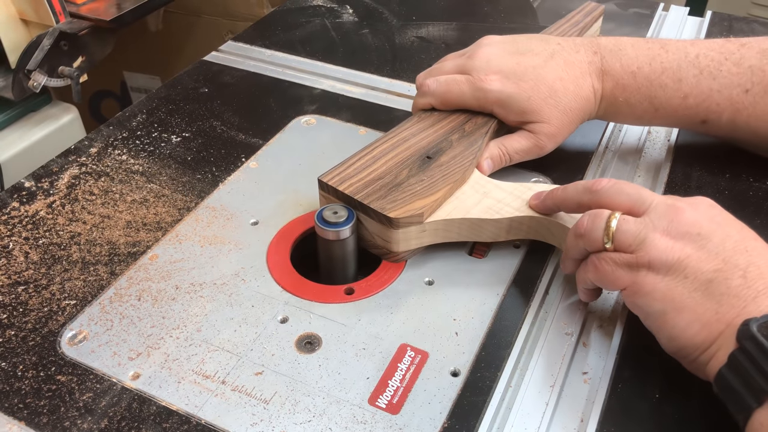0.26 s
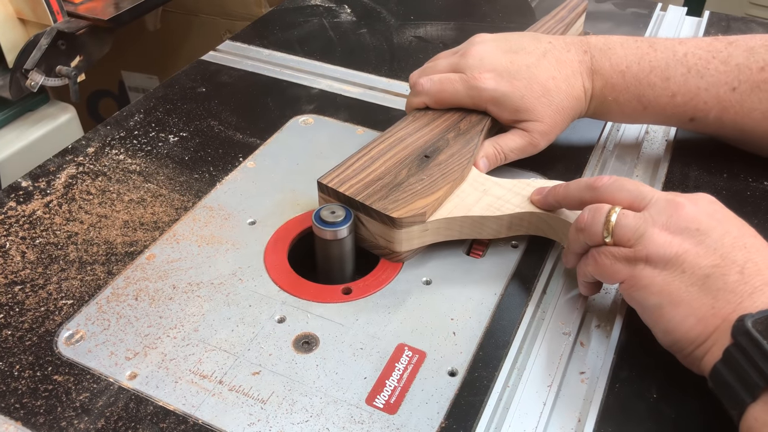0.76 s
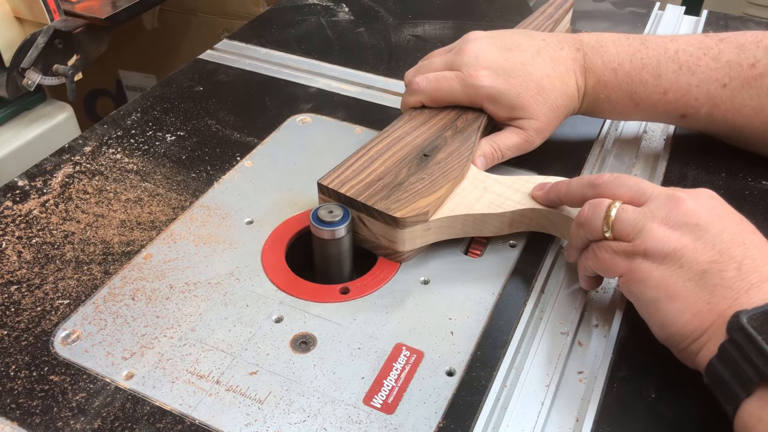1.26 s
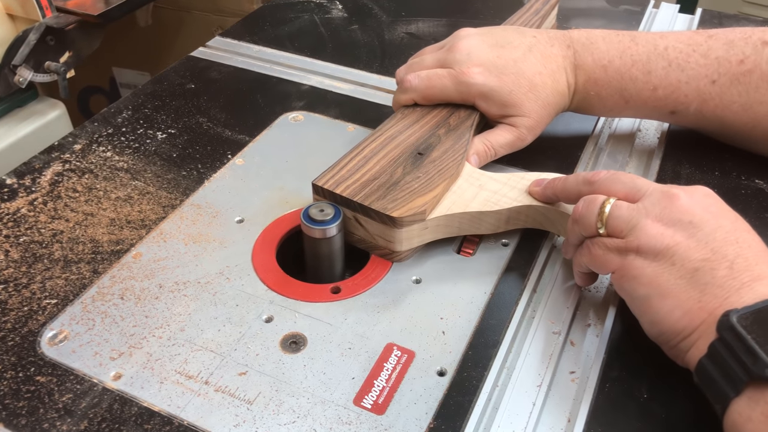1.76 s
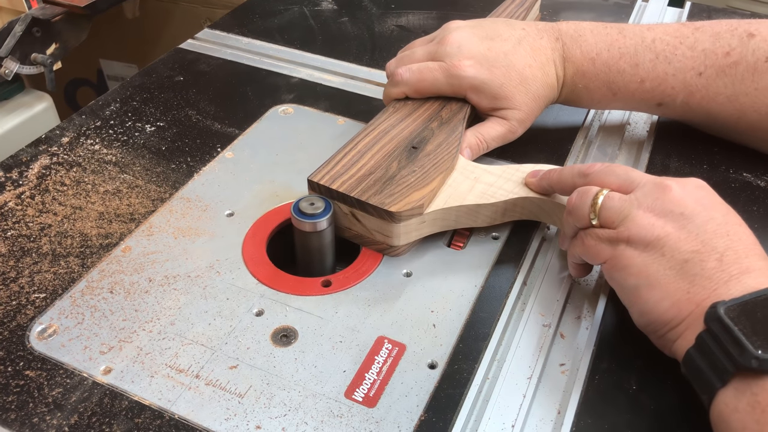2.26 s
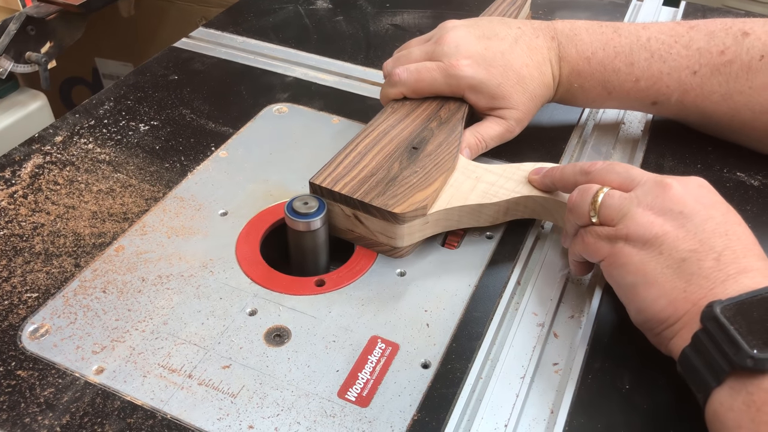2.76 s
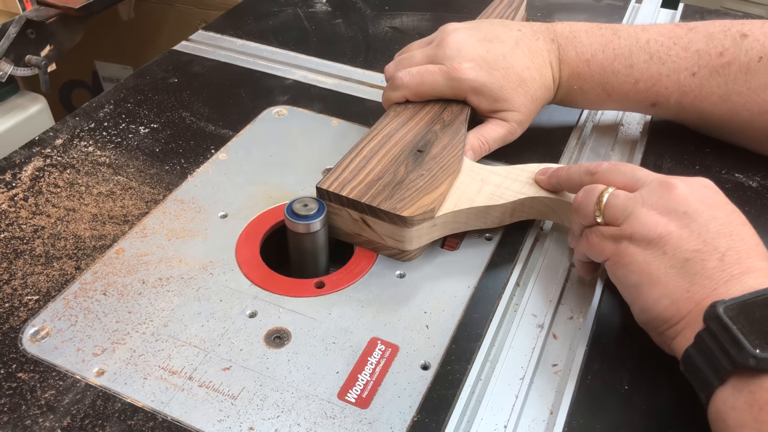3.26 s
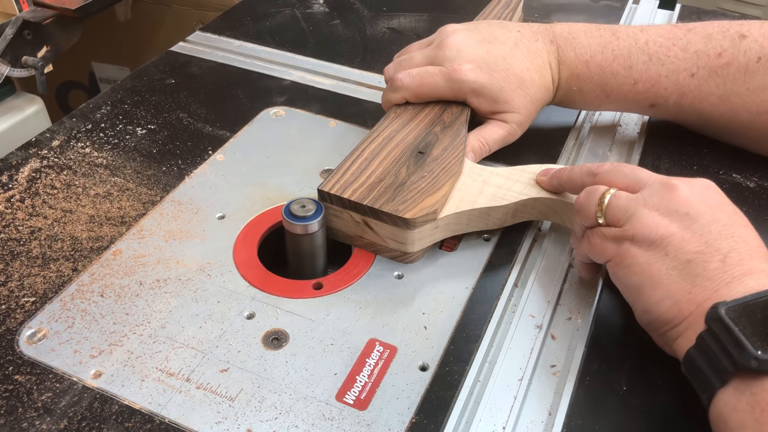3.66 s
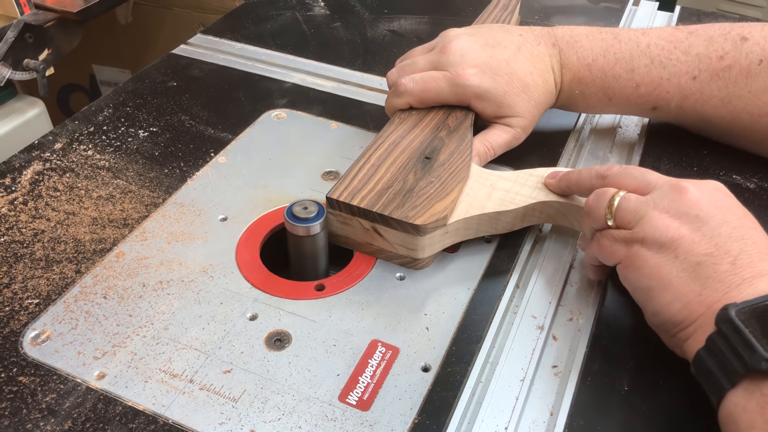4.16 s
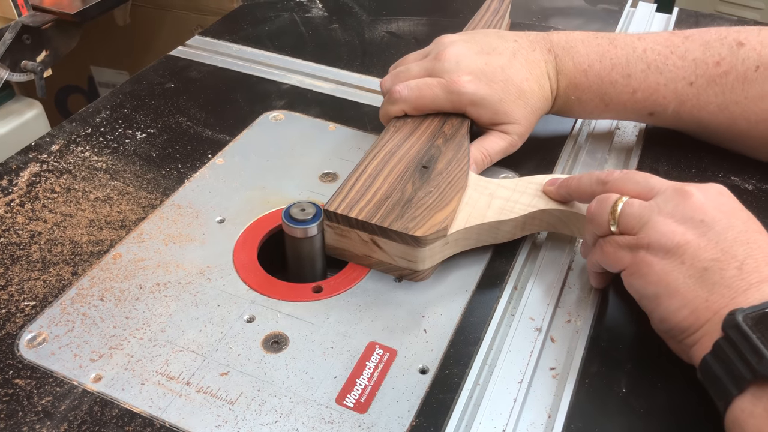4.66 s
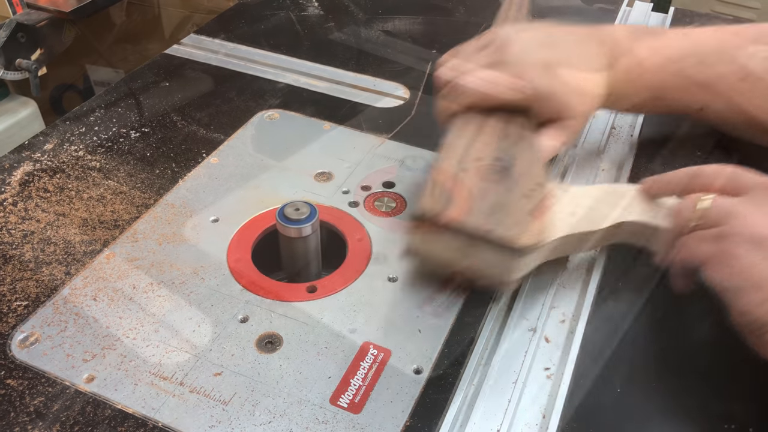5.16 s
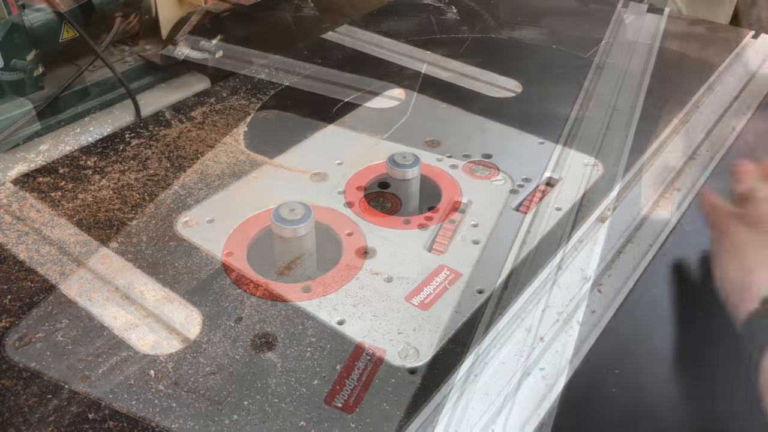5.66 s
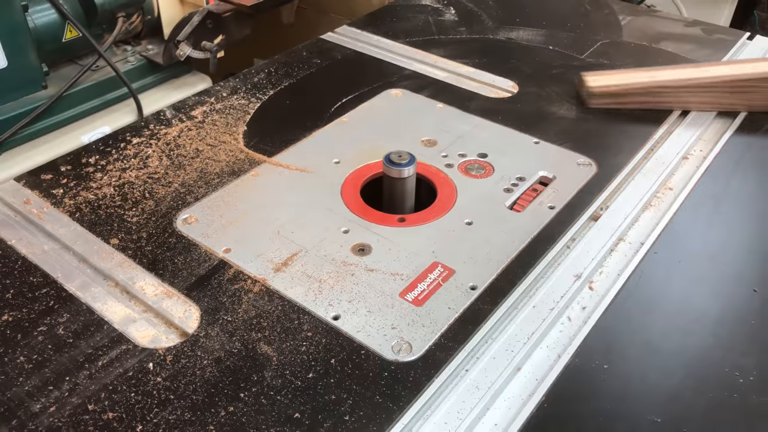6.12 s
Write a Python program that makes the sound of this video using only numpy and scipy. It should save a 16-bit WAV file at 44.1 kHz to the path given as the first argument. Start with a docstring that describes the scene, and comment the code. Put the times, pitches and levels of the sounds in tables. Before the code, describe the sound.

A high-speed router motor drones steadily with a low humming fundamental, stacked whining overtones and broad hissing air. Around the middle it becomes rougher and more crowded with buzz, then the overtones swell and waver as it recovers speed. Just before the end there is a hard edit, with the same machine resuming a touch faster, cleaner and less hissy. Heard close and dry, centred; no spin-down.

```python
"""A router under a metal table plate sings at multiples of its shaft rate, near 350 turns a second.
Each multiple is a sine on the running count of turns; its level follows the load.
Mains torque ripple and a bearing cage shift these multiples into side tones, and the cage hums itself.
The cooling fan roars as shaped noise through table and bit opening, heard close by one microphone.
The sound breaks off once and returns a little faster and duller."""
import sys
import numpy as np
from scipy import signal
from scipy.fft import rfft, irfft
from scipy.io import wavfile
from scipy.ndimage import uniform_filter1d

SR = 44100
rng = np.random.default_rng(int(sys.argv[2]) if len(sys.argv) > 2 else 0)


def wrap_up_sound(samples):
    """Save the sound to the file named by the first command line argument, as 16-bit audio."""
    columns = np.atleast_2d(samples).T
    # keep every value between -1 and 1, then stretch to whole-number steps
    tamed = np.clip(columns, -1, 1)
    steps = np.round(tamed * 32767).astype(np.int16)
    wavfile.write(sys.argv[1], SR, steps)


N = 281799
T = np.arange(N) / SR
BREAK_S, RETURN_S = 5.5842, 0.017  # the sound stops dead, then fades back in over this time
AFTER = T >= BREAK_S

# Shaft speed, creeping up as the load eases: start_s [s], speed_hz [turns/s]
SHAFT_SPEED = [(.17, 347.7), (1.0, 348.6), (1.55, 349), (2.1, 350.1), (3.2, 351.6), (4.03, 354.2),
               (4.58, 355.5), (5.5, 355.9)]
SPEED_AFTER_HZ = 360.9
# Course of the load: start_s [s], cut_depth [0-1], easing [0-1], workpiece_drawn_away [0-1]
LOAD_COURSE = [(0, 0, 0.05, 0), (1.1, 0, 0, 0), (2.2, 0.96, 0, 0.03), (3.3, 1, 0.03, 0), (3.7, 0.95, .6, 0),
               (4.2, 1, 0.95, 0), (4.7, 1, 0.99, 0), (5.15, 1, 1, 0.76), (5.57, 1, 0.99, 1)]
# Loud shaft multiples, base levels: multiple [shaft rates], shallow_db [dB rms], deep_db [dB rms],
# eased_db [dB rms], after_break_db [dB rms]
LOUD_MULTIPLES = [(1, -41, -41, -40.5, -40), (2, -51, -53, -47, -49), (3, -46, -46.5, -45.5, -57),
                  (4, -54.5, -58.5, -49, -44), (5, -46, -46.5, -40, -40.5), (6, -45, -46.5, -51, -47),
                  (9, -48, -48, -60, -62), (10, -54, -48, -62, -66), (12, -53.5, -46.5, -49, -50.5),
                  (24, -67, -55.5, -59.5, -60)]
# Passing swells and dips of loud multiples: middle_s [s], multiple [shaft rates], length_s [s], peak_db [dB]
MULTIPLE_SWELLS = [(.1, 5, 1.5, -8), (.3, 4, .7, 3), (.2, 9, .5, -3), (.3, 1, 1.3, -1.8), (1.05, 4, .7, -8),
                   (1.3, 12, .3, -4), (1.4, 2, 1.6, -8.5), (1.4, 9, 1, 4), (1.55, 6, .4, -4),
                   (1.55, 12, .4, 2.5), (1.85, 24, .5, -8), (3.05, 4, 1.2, -10), (3.503, 5, .6, 5.5),
                   (3.5, 9, .35, -6), (3.55, 10, 0.77, -12), (3.75, 6, 0.61, 5), (3.68, 9, .3, 7),
                   (4.02, 9, .35, 8), (3.95, 5, .6, 2), (4.0, 2, 0.57, 3.5), (4.15, 24, 1.7, 8),
                   (4.25, 3, 0.86, 4), (4.22, 6, .6, -7), (4.453, 5, 0.74, -6), (4.58, 4, 0.5, 5.5),
                   (4.6, 9, .3, 5), (4.95, 12, .7, 3.5), (5.12, 3, .4, 2), (5.13, 2, .35, -4),
                   (5.3, 12, .25, -6), (5.418, 5, 0.48, -12), (5.48, 12, .2, 4), (5.87, 3, .25, -10),
                   (6.073, 12, 0.28, -9), (6.3, 1, 0.71, 2)]
DRAWN_SHAFT_DB = 1.8  # the first multiple gains as the workpiece is drawn away
# Fainter shaft multiples: multiple [shaft rates], before_break_db [dB rms], after_break_db [dB rms]
FAINT_MULTIPLES = [(7, -61, -58.5), (8, -58.5, -57.5), (11, -57.5, -64), (13, -62.5, -68), (14, -63.5, -60),
                   (16, -63, -70), (36, -76, -66)]

RIPPLE_HZ = 120
# Torque ripple side tones, base levels: shaft_multiple [shaft rates], ripple_multiple [ripple rates],
# shallow_db [dB rms], deep_db [dB rms], after_break_db [dB rms]
RIPPLE_SIDE_TONES = [(0, 1, -68, -69, -70), (1, 2, -65, -66, -66), (1, -2, -76, -69, -72),
                     (2, 1, -64, -56, -68), (2, 2, -67, -58, -79), (3, -1, -67, -57, -79),
                     (3, -2, -65.5, -64, -68), (3, 2, -63, -65, -71), (4, 1, -57, -59, -67),
                     (4, -1, -58, -61.5, -72), (4, 2, -63, -62, -65), (5, -2, -56.5, -53.5, -66),
                     (5, -1, -68, -61, -65), (5, 1, -53.5, -52.5, -57), (5, 2, -62, -66, -73),
                     (6, -2, -65, -61, -57), (6, -1, -55.5, -51.5, -72), (6, 2, -59.5, -64, -80),
                     (7, -1, -71, -60.5, -80), (7, 1, -65, -67, -70), (8, -2, -69, -66, -74),
                     (8, 1, -69, -55, -72), (9, -1, -59, -56, -74), (9, 1, -59, -54, -70),
                     (10, 1, -70, -58, -75), (10, -2, -68, -64, -62), (11, -2, -67, -65, -75),
                     (11, 1, -66, -60, -77), (12, 1, -70, -58, -74), (12, -2, -70, -60, -80),
                     (13, -1, -70, -66, -78), (14, -2, -76, -73, -80)]
RIPPLE_EASED_DB, RIPPLE_DRAWN_DB = -6, -4
EASED_DEPTH = .6  # share of the cut depth left once eased

CAGE_RATIO = .415  # cage turns per shaft turn
# Bearing cage side tones, base levels: shaft_multiple [shaft rates], cage_multiple [cage rates],
# ripple_multiple [ripple rates], before_break_db [dB rms], after_break_db [dB rms]
CAGE_SIDE_TONES = [(1, -1, 0, -62.5, -64.5), (1, 1, 0, -63, -68), (2, 1, 0, -64, -75),
                   (3, -1, 0, -55.5, -55), (3, 2, 0, -66, -63), (4, -1, 0, -51, -63),
                   (4, 1, 0, -58.5, -53.5), (5, -1, 0, -50.5, -54.5), (5, 1, 0, -57.5, -60),
                   (5, 2, 0, -59, -61), (5, -2, 0, -62, -63), (6, -1, 0, -62, -67), (6, 1, 0, -59, -60),
                   (6, 2, 0, -73, -67), (6, -2, 0, -69, -69), (7, -1, 0, -62, -59), (8, 1, 0, -68, -64),
                   (14, 1, 0, -62, -62), (4, -1, -1, -77, -63), (4, -1, 1, -71, -63), (4, 1, 1, -77, -63),
                   (5, -1, -1, -60, -62), (6, -1, -1, -61, -67), (6, -1, 1, -69, -65)]
# the cut damps the cage side tones: start, fall and floor, then eased and drawn away
CAGE_START_DB, CAGE_HUSH_DB_PER_S, CAGE_DEEP_DB = -7.5, -10, -23
CAGE_EASED_DB, CAGE_DRAWN_DB = -1, 2
# the cage's own hum: base level, gain as the load eases, gain as the workpiece is drawn away, level after the
# break
HUM_DB, HUM_EASED_DB, HUM_DRAWN_DB, HUM_AFTER_DB = -78, 13, 11, -58

# Base spectrum of the fan roar: frequency_hz [Hz], before_break_db [dB per Hz], after_break_db [dB per Hz]
ROAR_SPECTRUM = [(35, -106, -108), (55, -99, -101), (100, -91.5, -92), (130, -83, -84), (197, -78.5, -76.5),
                 (423, -83, -81), (556, -78.5, -80), (780, -82, -77), (1500, -77, -77), (2470, -81.5, -82),
                 (4700, -80.5, -81), (8600, -80, -83.5), (12250, -83, -88.5), (14000, -87, -94),
                 (15000, -95.5, -95)]
# Hollows of table and bit opening lift the roar, echoes off the plate notch it:
# centre_hz [Hz], width_hz [Hz], before_break_db [dB], after_break_db [dB]
HOLLOWS_AND_NOTCHES = [(976, 163, 8, -3), (1254, 79, 4, 6), (1860, 150, 1.5, 1), (2090, 74, 3, -2),
                       (2390, 90, -1, 1), (3088, 350, 9.5, 4), (3400, 260, 3, 5), (3604, 400, 6, 3.5),
                       (4000, 160, 5, 6), (4270, 135, 5, 5.5), (5080, 100, 1.5, 4), (5640, 210, 1, 2),
                       (6100, 300, 1.5, 1), (6430, 170, -3.5, -7), (6930, 200, -3, -2), (7550, 300, 0, 2.5),
                       (8020, 220, -3, -3), (9700, 290, -3.5, -1), (10100, 360, 1.5, 5),
                       (11300, 670, -4, 2.5)]
# Roar change below 700 Hz, near 3 kHz, in the rest, above 9 kHz: eased_db [dB], drawn_away_db [dB]
ROAR_LOAD_SHIFT = [(.7, 1.5), (-.3, -1.2), (.5, -.3), (.3, -2.5)]
TOP_HZ = 15655


def shaft_multiples(shaft):
    """Harmonic series: periodic shaft forces radiate at whole multiples of the turning rate."""
    whine = 0
    for multiple, *levels_db in LOUD_MULTIPLES:
        # higher multiples waver more
        waver_db = .45 * np.sqrt(multiple)
        waver_rad = .0012 * multiple ** 2 + .01 * multiple
        whine = whine + tone(multiple * shaft, loud_db(multiple, *levels_db), waver_db, waver_rad)
    for multiple, early_db, late_db in FAINT_MULTIPLES:
        whine = whine + tone(multiple * shaft, np.where(AFTER, late_db, early_db), 2.3, .3)
    return whine


def loud_db(multiple, shallow_db, deep_db, eased_db, late_db):
    """Load-dependent excitation: each harmonic follows cut and easing, with its own passing swells."""
    depth, ease, drawn = load()
    cut_db = shallow_db + depth * (deep_db - shallow_db)
    level_db = np.where(AFTER, late_db, cut_db + ease * (eased_db - cut_db))
    if multiple == 1:
        level_db = level_db + DRAWN_SHAFT_DB * drawn
    for middle_s, which, length_s, peak_db in MULTIPLE_SWELLS:
        if which == multiple:
            position = np.clip((T - middle_s) / length_s, -.5, .5)
            level_db = level_db + peak_db * np.cos(np.pi * position) ** 2
    return level_db


def ripple_tones(shaft):
    """Modulation sidebands: torque ripple shifts shaft multiples, and the deeper cut changes their balance."""
    depth, ease, drawn = load()
    depth = depth * (1 - ease * (1 - EASED_DEPTH))
    ease_db = RIPPLE_EASED_DB * ease + RIPPLE_DRAWN_DB * drawn
    tones = 0
    for shaft_multiple, ripple_multiple, shallow_db, deep_db, late_db in RIPPLE_SIDE_TONES:
        turns = shaft_multiple * shaft + ripple_multiple * RIPPLE_HZ * T
        early_db = shallow_db + depth * (deep_db - shallow_db) + ease_db
        tones = tones + tone(turns, np.where(AFTER, late_db, early_db), 2.34, .4)
    return tones


def cage_tones(shaft):
    """Epicyclic modulation: the cage turns slower than the shaft, hums, and shifts its multiples."""
    _, ease, drawn = load()
    cut_db = np.maximum(CAGE_START_DB + CAGE_HUSH_DB_PER_S * T, CAGE_DEEP_DB)
    rattle_db = cut_db + ease * (CAGE_EASED_DB - cut_db) + CAGE_DRAWN_DB * drawn
    hum_db = np.where(AFTER, HUM_AFTER_DB, HUM_DB + HUM_EASED_DB * ease + HUM_DRAWN_DB * drawn)
    tones = tone(CAGE_RATIO * shaft, hum_db, 1.5, .2)
    for shaft_multiple, cage_multiple, ripple_multiple, early_db, late_db in CAGE_SIDE_TONES:
        turns = (shaft_multiple + cage_multiple * CAGE_RATIO) * shaft + ripple_multiple * RIPPLE_HZ * T
        tones = tones + tone(turns, np.where(AFTER, late_db, early_db + rattle_db), 1.4, .16)
    return tones


def fan_roar(shaft):
    """Turbulence noise: broadband air, pulsing faintly with shaft and ripple, in flickering bands."""
    beat = 1 + .08 * np.sin(2 * np.pi * shaft)
    beat += .06 * np.sin(2 * np.pi * RIPPLE_HZ * T)
    beat += .04 * np.sin(4 * np.pi * RIPPLE_HZ * T)
    air = rfft(beat * undb(.5 * walk(14)) * rng.standard_normal(N))
    hz = np.maximum(np.arange(len(air)) * SR / N, 1)
    early_air = air * roar_gain(hz, 1)
    late_air = air * roar_gain(hz, 2)
    _, ease, drawn = load()
    low_db, rasp_db, rest_db, top_db = (
        eased_db * ease + drawn_db * drawn for eased_db, drawn_db in ROAR_LOAD_SHIFT)
    roar = 0
    for step in range(-15, 13):  # third octaves from 1 kHz
        # triangular bands that add up to one
        share = np.clip(1 - abs(3 * np.log2(hz / 1000) - step), 0, 1)
        band = np.where(AFTER, irfft(late_air * share, N), irfft(early_air * share, N))
        if step < -1:
            shift_db = low_db
        elif step in (4, 5):
            shift_db = rasp_db
        elif step > 9:
            shift_db = top_db
        else:
            shift_db = rest_db
        roar = roar + band * undb(shift_db + .39 * walk(6))
    return roar


def roar_gain(hz, column):
    """Resonance and interference: hollows and echoes add peaks and notches to the base spectrum."""
    spectrum = np.array(ROAR_SPECTRUM, float)
    level_db = np.interp(np.log(hz), np.log(spectrum[:, 0]), spectrum[:, column])
    for centre_hz, width_hz, *heights_db in HOLLOWS_AND_NOTCHES:
        level_db += heights_db[column - 1] / (1 + (2 * (hz - centre_hz) / width_hz) ** 2)
    return undb(level_db) * np.sqrt(SR / 2)  # density per Hz to gain on white noise


def load():
    """Mechanical loading: cut depth, easing and drawing away over time, all zero after the break."""
    return [np.where(AFTER, 0, np.clip(curve(LOAD_COURSE, c), 0, 1)) for c in (1, 2, 3)]


def tone(turns, db, waver_db, waver_rad):
    """Phase accumulation: a sine on a running count of turns, with wavering level and phase."""
    phase = 2 * np.pi * (turns + rng.random()) + waver_rad * walk(25)
    return np.sqrt(2) * undb(db + waver_db * walk(12)) * np.sin(phase)


def walk(rate):
    """Smoothed random modulation: levels held 1 / rate s and slewed twice, spread near 1."""
    hold = int(SR / rate)
    steps = np.repeat(rng.standard_normal(N // hold + 1), hold)
    return 1.14 * uniform_filter1d(uniform_filter1d(steps, hold), hold)[:N]


def curve(rows, column=1):
    """Linear interpolation: one column of a table over time."""
    rows = np.array(rows, float)
    return np.interp(T, rows[:, 0], rows[:, column])


def undb(db):
    """Logarithmic level: decibels to amplitude gain."""
    return 10 ** (np.asarray(db) / 20)


def scene():
    """Superposition: motor tones and fan roar share one shaft and one break."""
    speed_hz = np.where(AFTER, SPEED_AFTER_HZ, curve(SHAFT_SPEED))
    shaft = np.cumsum(speed_hz) / SR  # running count of turns
    motor = shaft_multiples(shaft) + ripple_tones(shaft) + cage_tones(shaft)
    fade = np.where(AFTER, np.clip(.05 + (T - BREAK_S) / RETURN_S, 0, 1), 1)
    return np.tile(fade * (motor + fan_roar(shaft)), (2, 1))


def record(dry):
    """Band limiting: one microphone on both channels, with a steep low-pass at the top."""
    return signal.sosfilt(signal.ellip(16, .2, 70, TOP_HZ, fs=SR, output="sos"), dry)


dry = scene()
out = record(dry)
wrap_up_sound(out)
```